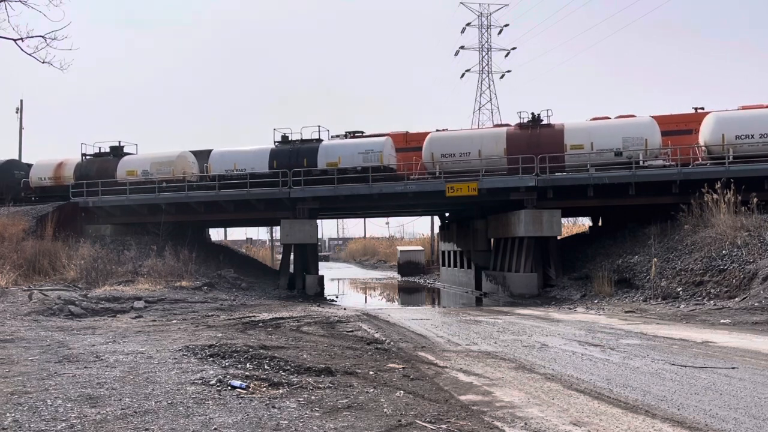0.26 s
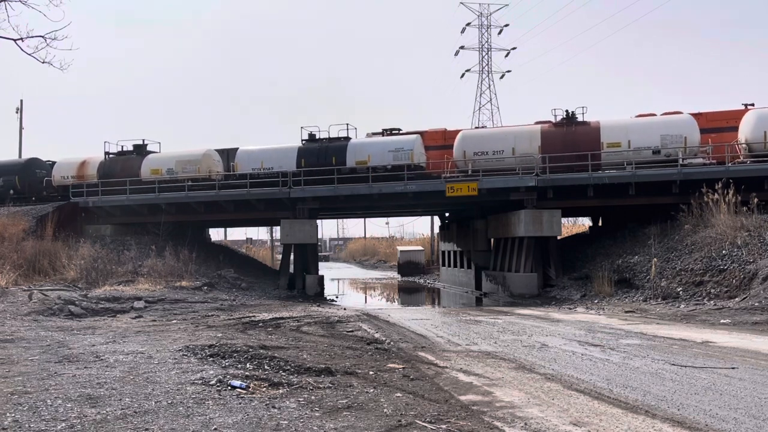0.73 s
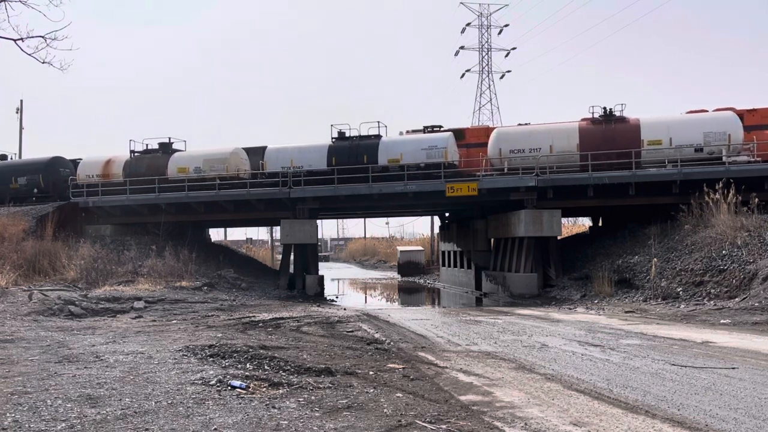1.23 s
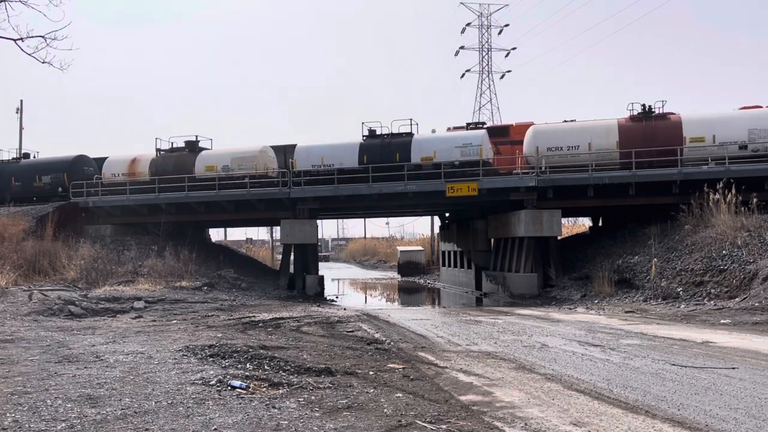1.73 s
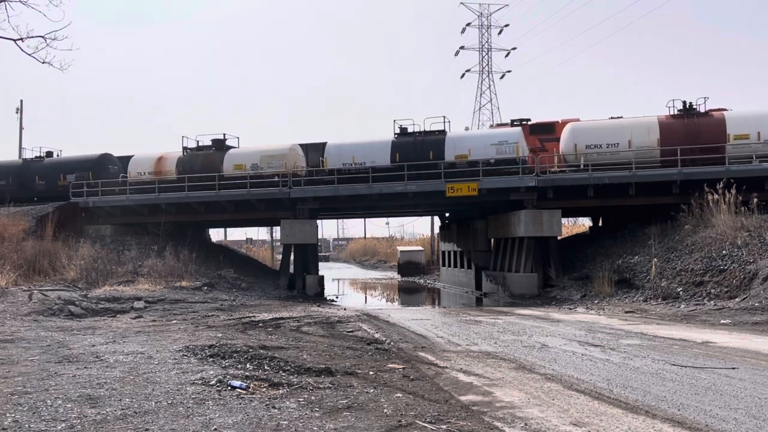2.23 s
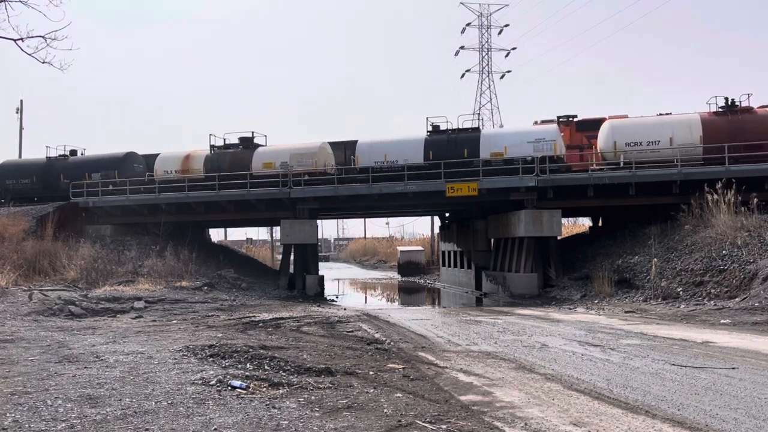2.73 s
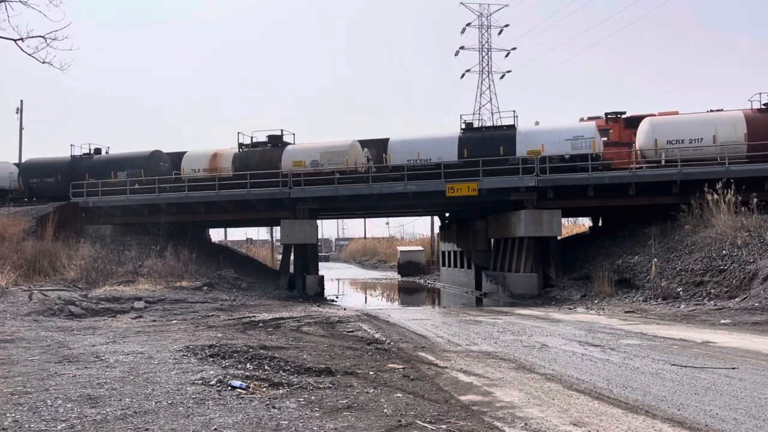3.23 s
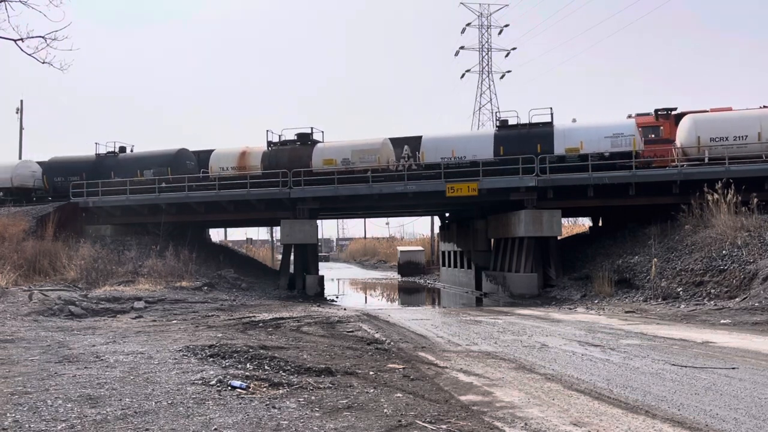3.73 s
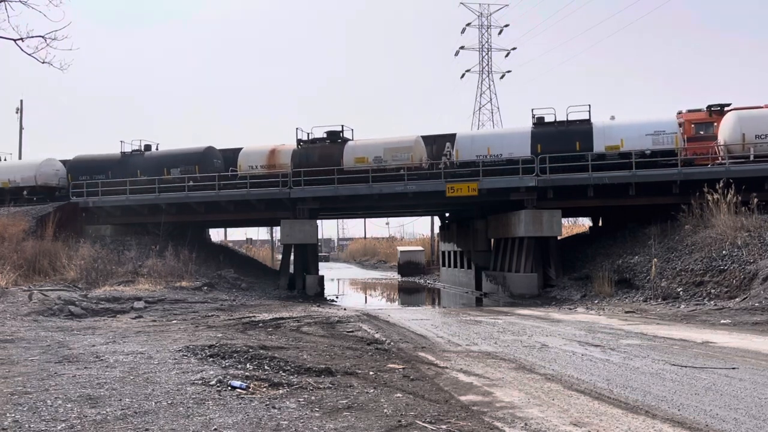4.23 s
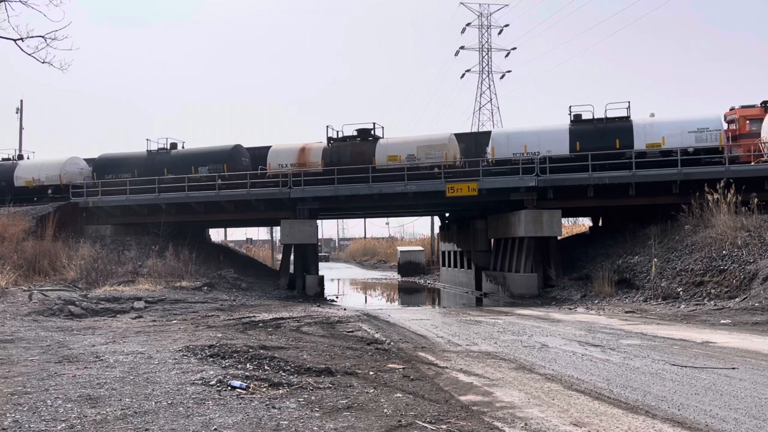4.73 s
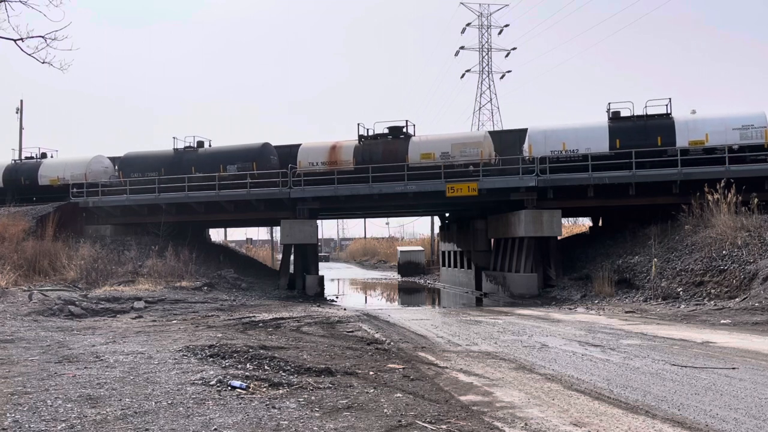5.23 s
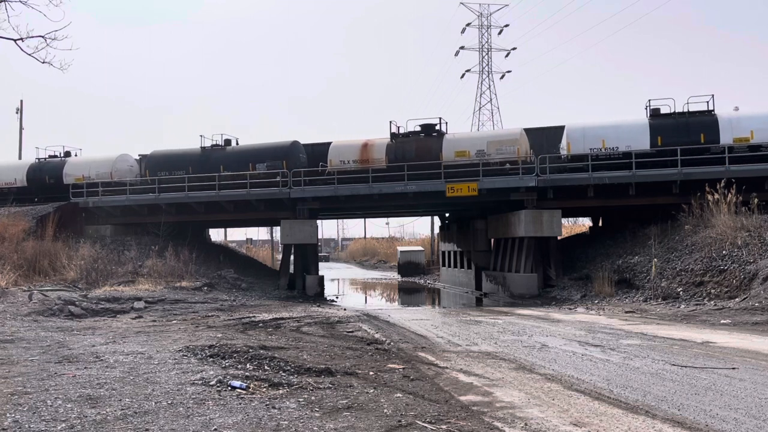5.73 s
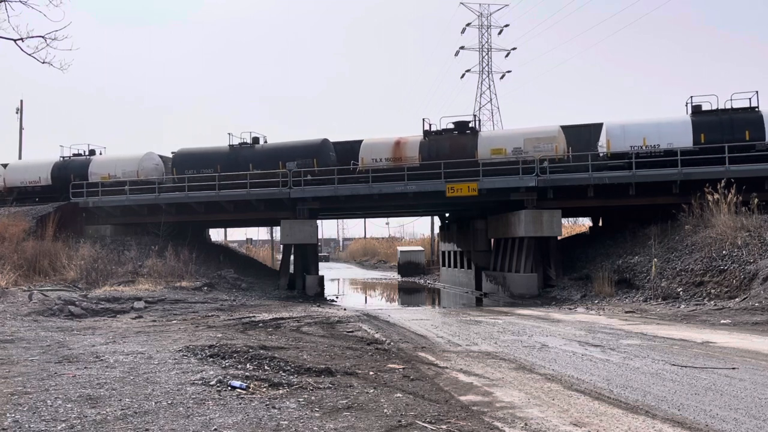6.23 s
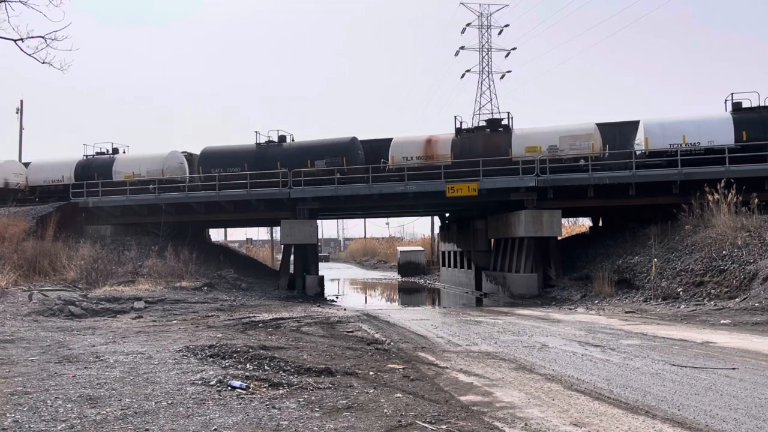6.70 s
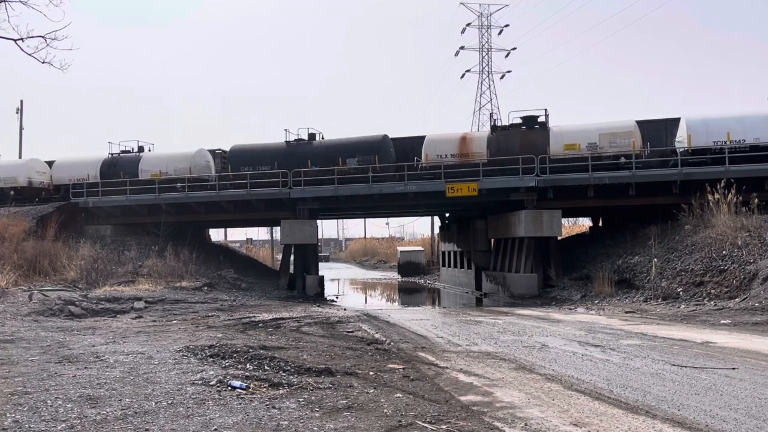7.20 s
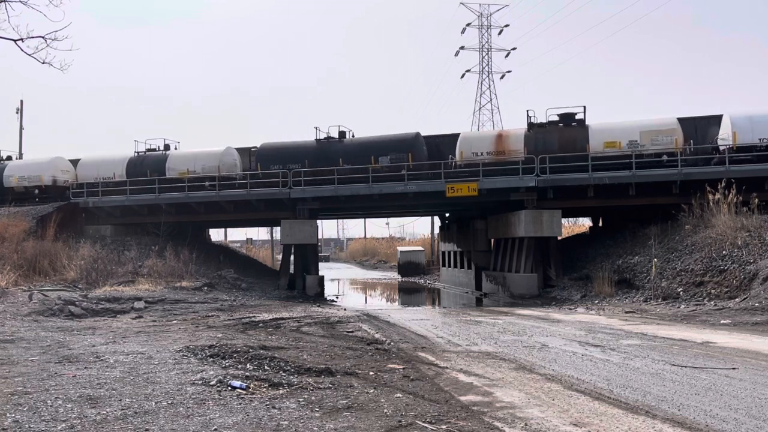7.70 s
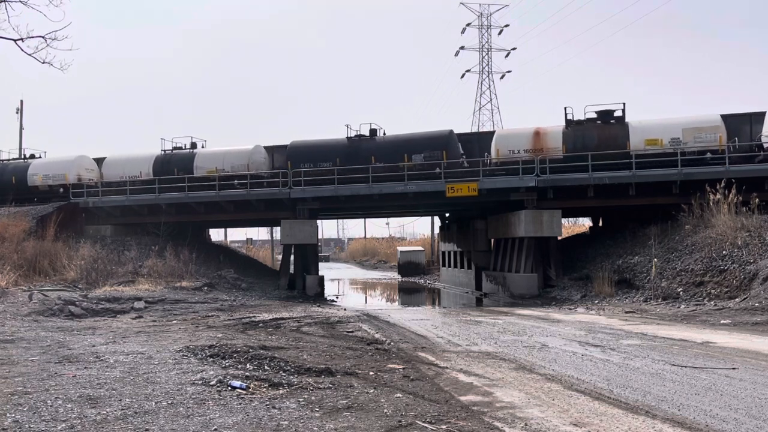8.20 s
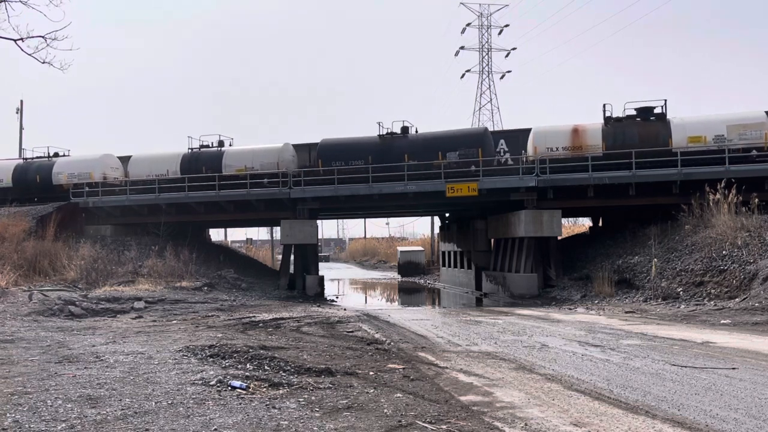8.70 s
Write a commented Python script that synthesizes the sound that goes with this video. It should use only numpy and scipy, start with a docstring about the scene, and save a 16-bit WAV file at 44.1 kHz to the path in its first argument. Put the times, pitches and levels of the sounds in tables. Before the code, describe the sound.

A continuous, bass-heavy train passage heard in the open from a moderate distance. Locomotives off to the right give a pulsing low drone around a hundred hertz, with broad roar growing duller as they pull away. Early whines glide down and vanish. Wagons on the steel bridge ahead add quiet, gritty hiss, irregular bursts of wheel clatter and a coming-and-going flange rasp, with one small hard tick near the end.

```python
"""Freight train on a steel bridge some way off: locomotives right, wagons ahead, a pair of microphones.
From the start one engine throttles down, its whines sinking, amid shaped noise for roar, rumble and wheels.
Its crank-locked sines then settle near the other engine's speed; the drone throbs, swells and dips.
Roar slides to duller spectra and greater left lag as the locomotives pull away; wheels hiss and clatter on.
Past eight seconds a small hard tick and its bounce ring a few short bright modes."""
import sys
import numpy as np
from scipy import signal
from scipy.fft import rfft, irfft, next_fast_len
from scipy.io import wavfile
from scipy.ndimage import map_coordinates

SR = 44100
rng = np.random.default_rng(int(sys.argv[2]) if len(sys.argv) > 2 else 0)


def inscribe(sig):
    """Save sig as 16-bit PCM at rate SR to the path in sys.argv[1].

    A 1-D sig is mono; a 2-D sig holds one channel per row.
    Samples are clipped to [-1, 1] before scaling.
    """
    pcm = np.round(np.clip(np.atleast_2d(sig).T, -1, 1) * 32767)
    wavfile.write(sys.argv[1], SR, pcm.astype(np.int16))


N = 394694

# Levels stand ahead of the recorder's gain; spectra give shape only, their noise is scaled to rms 1.
# throttled engine, its governor hunting before it settles: t/s, f/Hz (crank turns)
CRANK_SPEED = [(0, 13.81), (.4, 13.5), (1, 12.13), (1.4, 11.62), (1.6, 11.56), (1.8, 11.68), (2.2, 12.07),
               (2.6, 12.27), (2.8, 12.27), (3.6, 11.85), (4, 11.98), (4.4, 12.05), (4.6, 12.05),
               (5.2, 12.025), (8.95, 12.016)]
# where in the crank turn the drone throbs loudest: t/s, lateness/rad, further lateness of order 9/rad
THROB_PHASE = [(0, 3, .7), (.3, -0.5, .7), (1, 0.6, .6), (1.5, 0.4, .8), (2.1, -0.05, .8), (2.45, 1.6, 1.2),
               (2.6, 2, 1), (3.1, 1.5, 1.6), (3.4, 0, 2.1), (3.6, 0.75, .5), (3.75, 1.7, -1.4),
               (3.9, 1.6, -1.4), (4.05, .6, -1), (4.5, 0.5, -.7), (4.8, -2, 1), (5.0, 2.1, .6),
               (5.25, 2.5, -.7), (5.4, 1.5, .7), (5.9, 0.5, 1.9), (6.3, 3, 0), (6.6, 1.5, .5),
               (7, 1.5, 1.1), (8.1, 1.8, .7), (8.35, 0.9, 0), (8.8, 0.1, 2.3), (8.95, 2.5, 1.3)]
# moments when the engines fire out of step and the drone dips: t/s, weaker over stronger/0-1 (held to .98)
OUT_OF_STEP = [(0.03, 0.31), (0.55, 1), (1.0, 0.03), (1.45, 0.03), (2.1, 0.4), (2.62, 0.05), (3.6, 0.51),
               (4.92, 0.9), (6.2, 1), (7.21, 0.33), (8.5, 0.34), (9.0, 0.7)]
# firing order with the engines in step: t/s, level/dB
FIRING_LEVEL = [(0, -14), (0.8, -16), (1.75, -13), (2.4, -11.5), (3.3, -10.5), (3.8, -5.5), (4.2, -10),
                (4.6, -9), (5.1, -7.5), (5.6, -10.5), (6.4, -10), (6.7, -10), (7.9, -11), (8.3, -11.5),
                (8.6, -21), (8.95, -19)]
# neighbouring orders: t/s, order 7/rms, order 9/rms (below zero it opposes the throb)
SIDE_ORDERS = [(0, .09, .04), (.55, .045, .055), (.9, .09, .09), (1.2, .07, .1), (1.4, .03, .04),
               (1.55, .05, .07), (1.75, .043, .055), (2.08, .065, .185), (2.3, .085, .095),
               (2.55, .028, -.04), (3.0, .03, -.045), (3.45, .07, .11), (3.63, .082, .125),
               (3.85, .06, .05), (4.15, .055, -.05), (4.82, .025, -.11), (5.0, .04, -.07),
               (5.25, .06, -.03), (5.38, .07, .035), (6.0, .01, .13), (6.25, .02, .045), (6.38, .085, .015),
               (6.65, .085, .075), (7.1, .022, .028), (7.62, .093, .096), (8.22, .068, .028),
               (8.95, .028, .115)]
# weak orders of the throttled engine: multiple of crank rate, mean level/dB
WEAK_ORDERS = [(5, -33), (6, -36), (10, -35), (11, -37), (18, -42)]
# second engine, steady: multiple of crank rate, level/dB relative to the next table
SECOND_ORDERS = [(8, -4), (9, -6), (10, -3), (19, 0)]
# second engine: t/s, level/dB
SECOND_LEVEL = [(0, -31), (.6, -26), (.9, -39), (1.6, -36.5), (2.1, -42.5), (8.95, -48.5)]
SECOND_CRANK_HZ = 12.0
# whines running down with the throttle: t/s, turbocharger f/Hz, level/dB, gear f/Hz, level/dB
# (both levels before WHINE_TRIM_DB)
WHINE_GLIDES = [(0, 1120, -41, 990, -40), (.12, 1105, -38, 980, -39), (.35, 1072, -39, 960, -41),
                (.52, 1052, -41, 935, -45), (.62, 1040, -45, 915, -50), (.8, 1028, -37, 900, -60),
                (.94, 1020, -40, 885, -70), (1.02, 1015, -47, 880, -70), (1.12, 1010, -39, 870, -70),
                (1.35, 995, -42, 850, -70), (1.5, 986, -55, 840, -70), (8.95, 976, -71, 798, -72)]
WHINE_TRIM_DB = -1.5
# thin hum: t/s, mean level/dB
HUM_LEVEL = [(0, -62), (1.3, -58), (1.75, -46), (2.05, -52), (2.4, -48), (2.65, -53), (2.95, -42),
             (3.2, -45), (3.45, -43), (3.7, -47), (4, -44), (4.6, -45), (5, -47), (5.3, -43), (6.1, -46),
             (6.4, -55), (6.75, -49), (7.2, -56), (8, -50), (8.95, -55)]
GEAR_TEETH, HUM_LAG_S = 79.1, .08  # hum's multiple of crank rate; it trails the crank's changes of speed
# locomotive noise: t/s, rumble level/dB, roar level/dB, bright roar level/dB
ROAR_LEVELS = [(0, -18.5, -20, -27.5), (.3, -28, -21, -29), (.8, -20.5, -21.5, -29.5),
               (1.3, -21.5, -21.5, -31.5), (1.8, -20.5, -21.5, -31.5), (2.2, -27.5, -21, -30),
               (2.6, -21.5, -23.5, -31.5), (3, -26, -24, -32), (3.4, -25, -23, -31), (4.2, -27, -24, -33),
               (4.9, -27, -23.5, -35.5), (5.6, -28, -24, -33), (6.2, -24, -25, -33),
               (6.7, -21.5, -24.5, -31.5), (7.2, -23.5, -25.5, -34), (7.75, -30, -24, -34),
               (8.4, -20, -25, -34.5), (8.95, -20.5, -23.5, -33)]
DIP_RUMBLE_DB, DIP_ROAR_DB = 4, 0.5  # the noise comes forward where the drone dips
# retreat to the right: t/s, left microphone lag of bright roar/ms, distance/0-1
RETREAT = [(0, 0.054, 0.3), (1, 0.073, 0.44), (2, 0.12, 0.42), (3, 0.14, 0.48), (4, 0.2, 0.5),
           (5, 0.2, 0.6), (6, 0.26, 0.8), (8.95, 0.29, 0.86)]
BASS_LAG_FACTOR = 1.55  # low sound lags by this much more
# bridge rumble: f/Hz, level/dB per Hz
RUMBLE_SPECTRUM = [(12, -55.5), (22, -20), (30, -17), (42, -5), (58, 8), (72, -0.5), (95, 4), (125, -4),
                   (160, -7.5), (220, -48.5), (400, -120)]
# low roar, one table near and one far: f/Hz, level/dB per Hz
LOW_ROAR_SPECTRA = [(79, -36.5), (135, -9), (162, 2.5), (193, -6), (221, -4.5), (253, -8), (316, -9.5),
                    (451, 5.5), (542, -1), (586, -7.5), (715, -11), (845, -41.5), (900, -10.5), (1170, -51),
                    (1980, -120)], [(79, -42), (135, -9.5), (221, -2), (285, -7), (318, -16), (356, -17.5),
                    (391, -24), (434, -5), (462, -9.5), (533, -5.5), (660, -11.5), (774, -13), (900, -28.5),
                    (1170, -55), (1980, -120)]
# bright roar, one table near and one far: f/Hz, level/dB per Hz
BRIGHT_ROAR_SPECTRA = [(460, -25), (780, -11.5), (854, -20), (994, -8.5), (1170, 0), (1300, -5),
                       (1430, -10), (1560, -6), (1680, -5.5), (1800, -5), (2100, -9), (2300, -10),
                       (2560, -15), (3000, -30), (3900, -48), (6600, -120)], [(460, -30.5), (780, -4.5),
                       (896, -9), (980, -8), (1060, -14), (1210, -8.5), (1790, -14.5), (2200, -29),
                       (2860, -43), (4840, -120)]
# wagons, steady part: t/s, rail noise level/dB, wheel hiss level/dB
WAGON_LEVELS = [(0, -40, -47.5), (1.3, -40.5, -49), (2.2, -38, -48), (2.9, -41, -51), (4.2, -41.5, -47),
                (5, -44, -50), (5.8, -43.5, -50), (6.5, -41.5, -48), (7.2, -44, -51.5), (8.3, -44, -52),
                (8.95, -43, -49.5)]
# bursts of wheel clatter: centre t/s, spread/s, rail rise/dB, hiss rise/dB
CLATTER_BURSTS = [(0.034, 0.097, 1.5, 3.5), (0.573, .04, 1.5, 0), (0.91, 0.046, 0, 2), (1.476, 0.063, 0, 2),
                  (1.65, 0.033, 4, 3), (2.04, 0.071, 2.5, 0), (2.37, 0.023, 0, -0.5), (2.903, .02, 3.5, -1),
                  (3.195, 0.063, 2, 3.5), (3.365, 0.051, 1.5, 3.5), (3.862, 0.059, 1, 3),
                  (4.698, 0.037, 1, 1.5), (6.036, 0.04, 0.5, 3), (6.243, 0.0106, 0, 0),
                  (6.422, 0.0059, 2.5, 3), (6.622, 0.084, 1.5, 3.5), (7.09, 0.012, 0, 3.5),
                  (7.447, 0.0059, 4, 4), (7.496, 0.17, 2, 4), (7.498, 0.026, 1, 5.5), (7.8, .01, -3, 2.5),
                  (8.666, 0.047, 2, 3.5)]
# rail noise: f/Hz, level/dB per Hz
RAIL_SPECTRUM = [(1060, -17), (1800, -2.5), (2320, 1), (2600, -1.5), (3040, -1.5), (3460, -4), (4140, -6.5),
                 (4850, -12.5), (5500, -29), (7150, -52.5), (12100, -120)]
# wheel hiss: f/Hz, level/dB per Hz
HISS_SPECTRUM = [(2000, -100), (3800, -5.5), (4800, 1.5), (5600, 1.5), (6300, -1.5), (7150, -3.5),
                 (8300, -1), (9300, -1), (9900, 1), (10500, -0.5), (11000, -4), (11500, -7.5),
                 (12100, -19.5)]
# hiss above 7 kHz lifts, sinks, and partly returns: t/s, change of level/dB
HIGH_HISS_CHANGE = [(0, -2.5), (1, 1), (2.2, 1.5), (3.4, -2), (4.2, -4), (6, -3.5), (6.7, -4.5),
                    (8.95, -2.5)]
# flange rasp, coming and going: t/s, level/dB
RASP_LEVEL = [(0, -50), (3, -65), (3.9, -53), (4.7, -54), (5.5, -51), (5.8, -54), (5.97, -44), (6.12, -55),
              (6.25, -48), (6.42, -48), (6.6, -45), (6.85, -45), (7.1, -55), (7.3, -49), (7.55, -47),
              (7.75, -51), (8.3, -51), (8.5, -50), (8.65, -49), (8.75, -46), (8.87, -41), (8.95, -43)]
# flange rasp: f/Hz, level/dB per Hz
RASP_SPECTRUM = [(1000, -120), (1900, -36.5), (2350, -18), (2600, -1.5), (2820, -5), (3200, -15),
                 (3700, -11), (4300, -19), (5200, -21), (6100, -16), (6800, -19), (7500, -38.5),
                 (11000, -120)]
# sound from ahead: f/Hz, left-right likeness/0-1
AHEAD_LIKENESS = [(2000, .8), (2600, .75), (4100, .85), (4600, .65), (5100, .3), (5700, .65), (6400, .85),
                  (7150, .35), (7700, .72), (8300, .99), (8800, .99), (9100, .78), (9700, .8), (10000, 1),
                  (10550, 1), (10850, .5), (11300, .5), (11600, 1)]
# sound from ahead: f/Hz, left channel's phase lead/rad
AHEAD_PHASE_LEAD = [(1800, -.3), (2500, .5), (3000, 1.1), (4300, .5), (4900, .5), (5350, 1.4), (6800, 0),
                    (7050, 0), (7450, 1), (8400, 0), (8900, 0), (9300, -1.4), (9900, -3.14), (10550, -3.14),
                    (11000, -4.2), (11500, -6.28)]
# small hard tick and its bounce: t/s, strength of the exciting click/dB
TICK_CLICKS = [(8.064, -28.5), (8.0672, -40)]
# ringing of the tick: f/Hz, relative level/dB, 60 dB decay/s
TICK_RINGS = [(6500, -3, .006), (7500, 0, .008), (8400, -2, .007), (9300, -4, .006), (11300, -5, .006)]
# microphone pair: f/Hz, left minus right level/dB
MICROPHONE_BALANCE = [(30, .3), (60, .5), (110, .5), (190, -0.5), (350, 0.9), (620, -2), (1110, -1.5),
                      (1700, 0), (2300, 2.5), (2900, 1), (3900, 0.5), (5050, 5), (6300, 0.7), (7200, 4),
                      (8400, 0), (11500, 0.5)]
TOP_STOP_HZ = 12387.9  # the recorder has cut 70 dB from here up


def from_db(db):
    """Gain of a level in dB."""
    return 10 ** (np.asarray(db) / 20)


def in_time(rows):
    """Columns of a table after t/s, one value per sample."""
    s, *columns = np.transpose(rows)
    return [np.interp(np.arange(N) / SR, s, column) for column in columns]


def rms_one(x):
    """Scaled to rms 1."""
    return x / np.sqrt(np.mean(x ** 2) + 1e-20)


def drift(rate_hz):
    """Slow chance of spread 1: noise through two equal poles, drawn every 40 samples."""
    pole = np.exp(-80 * np.pi * rate_hz / SR)
    noise = rng.standard_normal(N // 40 + 2002)
    slow = signal.lfilter([1], [1, -2 * pole, pole * pole], noise)[2000:]
    return np.interp(np.arange(N) / 40, np.arange(len(slow)), rms_one(slow - slow.mean()))


def filtered(x, response):
    """x through a response given as a function of Hz."""
    size = next_fast_len(N)
    hz = np.maximum(np.arange(size // 2 + 1), 1) * SR / size
    return irfft(rfft(x, size) * response(hz), size)[..., :N]


def at_hz(points, hz):
    """A spectrum table read on a log frequency axis."""
    table_hz, values = np.transpose(points)
    return np.interp(np.log(hz), np.log(table_hz), values)


def coloured(x, spectrum):
    """x shaped to a spectrum; rms 1."""
    return rms_one(filtered(x, lambda hz: from_db(at_hz(spectrum, hz))))


def late_left(pair, lag_ms, order):
    """A source on the right reaches the left microphone later."""
    at = np.arange(N) - lag_ms * SR / 1000
    left = map_coordinates(pair[0], [at], order=order, mode="nearest")
    return np.array([left, pair[1]])


def noise_pair(alike, grit_db=0., grit_share=0.):
    """Two partly alike noises, likeness one value or a table by Hz; a share of samples are uneven knocks."""
    table = alike if np.ndim(alike) else [(1, alike)]
    height_db = grit_db * np.minimum(rng.exponential(1, N), 4)
    knocks = (rng.random(N) < grit_share) * from_db(height_db)
    noise = rng.standard_normal((2, N)) * (1 + knocks)
    sign = np.array([[1], [-1]])
    mid, side = filtered(noise, lambda hz: np.sqrt(1 + np.clip(at_hz(table, hz), 0, 1) * sign))
    return mid + side * sign


def patchy(pair, depth_db, patch_s, patch_hz):
    """Random patches of time and pitch come forward and recede, as many rolling parts take turns."""
    hz, s, z = signal.stft(pair, SR, nperseg=1024)
    grid = rng.standard_normal((200, 400))
    where = np.meshgrid(hz / patch_hz, s / patch_s, indexing="ij")
    patches = map_coordinates(grid, where, order=1, mode="wrap")
    gain = rms_one(from_db(depth_db * patches))
    return signal.istft(z * gain, SR, nperseg=1024)[1][:, :N]


def tone(turns, db, waver):
    """A sine of given rms level whose phase wanders by waver radians."""
    phase = 2 * np.pi * (turns + rng.random()) + waver * drift(0.84)
    return np.sqrt(2) * from_db(db) * np.sin(phase)


def beat():
    """Two firing tones summed, one cycle of slip from dip to dip; 1 when in step."""
    slip, share = in_time([(s, k, share) for k, (s, share) in enumerate(OUT_OF_STEP)])
    share = np.clip(share, 0, .98)
    return np.abs(1 - share * np.exp(2j * np.pi * slip)) / (1 + share)


def throbbing_drone(crank, in_step):
    """Firing order 8 beats once a crank turn against its neighbours, orders 7 and 9."""
    firing_db, = in_time(FIRING_LEVEL)
    below, above = in_time(SIDE_ORDERS)
    late, skew = in_time(THROB_PHASE)
    angle = 2 * np.pi * crank
    firing = in_step * from_db(firing_db) * np.cos(8 * angle)
    sides = below * np.cos(7 * angle + late) + above * np.cos(9 * angle - late - skew)
    return np.sqrt(2) * (firing + sides)


def second_engine():
    """Sines at multiples of a steady crank rate."""
    crank = SECOND_CRANK_HZ * np.arange(N) / SR
    level_db, = in_time(SECOND_LEVEL)
    return sum(tone(k * crank, db + level_db, waver=1.0) for k, db in SECOND_ORDERS)


def whines():
    """Turbocharger and gear sines glide down with the throttle."""
    turbo_hz, turbo_db, gear_hz, gear_db = in_time(WHINE_GLIDES)
    return sum(tone(np.cumsum(hz) / SR, db + WHINE_TRIM_DB + 2.2 * drift(5), waver=1.1)
               for hz, db in ((turbo_hz, turbo_db), (gear_hz, gear_db)))


def gear_hum(crank):
    """A thin hum follows the crank at a fixed multiple, a little late."""
    late_crank = np.interp(np.arange(N) - HUM_LAG_S * SR, np.arange(N), crank)
    level_db, = in_time(HUM_LEVEL)
    return tone(GEAR_TEETH * late_crank, level_db + 1.2 * drift(4), waver=.6)


def engines(crank, in_step):
    """Uneven cylinders sound multiples of the crank rate, joined by whines and hum."""
    out = throbbing_drone(crank, in_step)
    out += sum(tone(k * crank, db + 3 * drift(3.1), waver=1.04) for k, db in WEAK_ORDERS)
    return out + second_engine() + whines() + gear_hum(crank)


def receding(alike, spectra, distance):
    """Noise whose colour slides from the near to the far spectrum."""
    noise, far = noise_pair(alike), np.clip(distance, 0, 1)
    return (1 - far) * coloured(noise, spectra[0]) + far * coloured(noise, spectra[1])


def roar(lag_ms, distance, dip):
    """Exhaust and fan noise from the locomotives, and the bridge's rumble; low and bright parts."""
    rumble_db, roar_db, bright_db = in_time(ROAR_LEVELS)
    rumble = from_db(rumble_db + DIP_RUMBLE_DB * dip) * coloured(noise_pair(0.98), RUMBLE_SPECTRUM)
    low_gain = from_db(roar_db + DIP_ROAR_DB * dip + 0.45 * drift(9.6))
    low_noise = receding(0.94, LOW_ROAR_SPECTRA, distance)
    low = rumble + low_gain * patchy(low_noise, depth_db=2.0, patch_s=.15, patch_hz=71.6)
    bright_gain = from_db(bright_db + 0.89 * drift(8))
    bright_noise = receding(0.85, BRIGHT_ROAR_SPECTRA, distance)
    bright = bright_gain * patchy(bright_noise, depth_db=1.3, patch_s=.3, patch_hz=59.7)
    return low, late_left(bright, lag_ms, order=3)


def clatter():
    """Bell-shaped changes of rail noise and hiss, in dB."""
    t = np.arange(N) / SR
    return sum(np.exp(-.5 * ((t - s) / spread) ** 2) * np.array([[rail_db], [hiss_db]])
               for s, spread, rail_db, hiss_db in CLATTER_BURSTS)


def wheel_hiss(level_db):
    """Gritty noise, its part above 7 kHz changing level on its own."""
    noise = noise_pair(AHEAD_LIKENESS, grit_db=2.7, grit_share=.01)
    hiss = from_db(level_db + 0.88 * drift(28)) * coloured(noise, HISS_SPECTRUM)
    low = signal.sosfilt(signal.butter(4, 7000, fs=SR, output="sos"), hiss)
    high = signal.sosfilt(signal.butter(4, 7000, "high", fs=SR, output="sos"), hiss)
    return low + from_db(in_time(HIGH_HISS_CHANGE)[0]) * high


def flange_rasp(rail_rise_db):
    """Knock-laden ringing noise that shares the clatter of the rails."""
    noise = noise_pair(AHEAD_LIKENESS, grit_db=4.5, grit_share=0.0095)
    return from_db(in_time(RASP_LEVEL)[0] + 0.76 * rail_rise_db) * coloured(noise, RASP_SPECTRUM)


def wagons(crank):
    """Gritty wheel noise that flutters with loose parts and the engine's shake."""
    rises_db = clatter()
    rail_db, hiss_db = in_time(WAGON_LEVELS) + rises_db
    rail_noise = noise_pair(AHEAD_LIKENESS, grit_db=4.0, grit_share=0.0056)
    rails = from_db(rail_db + .5 * drift(24)) * coloured(rail_noise, RAIL_SPECTRUM)
    rolling = patchy(rails + wheel_hiss(hiss_db), depth_db=1.5, patch_s=.12, patch_hz=506)
    shake_db = .7 * np.sin(2 * np.pi * crank)  # once a crank turn
    left, right = flange_rasp(rises_db[0]) + from_db(shake_db + 0.19 * drift(18)) * rolling
    # left and right differ in phase by pitch, opposed near 10 kHz
    left = filtered(left, lambda hz: np.exp(1j * at_hz(AHEAD_PHASE_LEAD, hz)))
    return np.array([left, right])


def ticks():
    """A hard click rings a few short bright modes, alike in both channels."""
    clicks = np.zeros(N) + 1e-18  # never quite zero
    for s, db in TICK_CLICKS:
        clicks[round(s * SR)] = from_db(db)
    out = 0
    for hz, db, t60 in TICK_RINGS:
        pole, w = from_db(-60 / (t60 * SR)), 2 * np.pi * hz / SR
        strike = [0, .5 * from_db(db) * np.sin(w)]
        out = out + signal.lfilter(strike, [1, -2 * pole * np.cos(w), pole * pole], clicks)
    return out


def scene():
    """Locomotives off to the right, wagons ahead."""
    crank = np.cumsum(in_time(CRANK_SPEED)[0]) / SR  # turns
    lag_ms, distance = in_time(RETREAT)
    in_step = beat()
    low, bright = roar(lag_ms, distance, 1 - in_step)
    low += engines(crank, in_step)
    # long waves bend round the recorder's body and lag more
    low = late_left(low, BASS_LAG_FACTOR * lag_ms, order=1)
    return low + bright + wagons(crank) + ticks()


def record(dry):
    """The microphones differ in colour, peaks are rounded, the top is cut."""
    pair = filtered(dry, lambda hz: from_db(at_hz(MICROPHONE_BALANCE, hz) * [[.5], [-.5]]))
    steep = signal.cheby2(20, 70, TOP_STOP_HZ, fs=SR, output="sos")
    return signal.sosfilt(steep, 1.648 * np.tanh(pair / 1.452))


dry = scene()
out = record(dry)
inscribe(out)
```